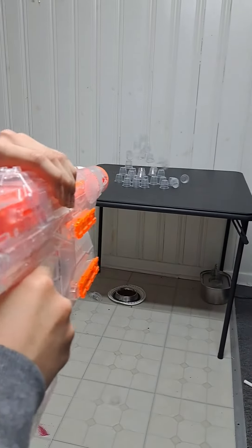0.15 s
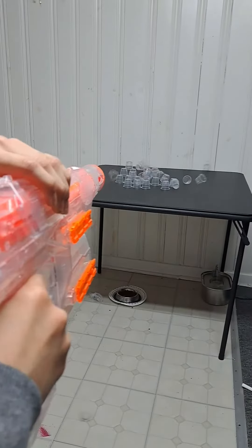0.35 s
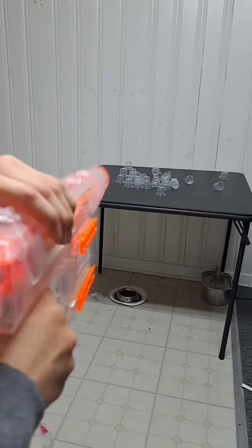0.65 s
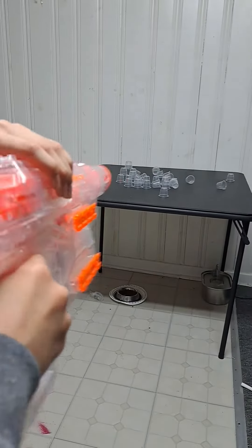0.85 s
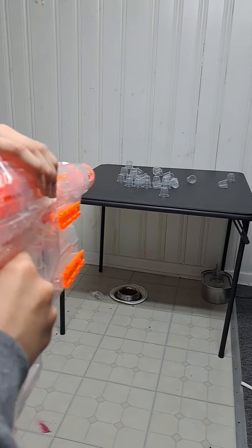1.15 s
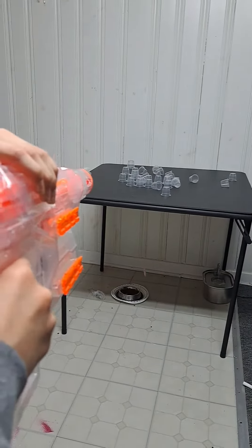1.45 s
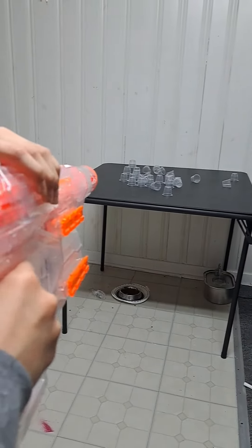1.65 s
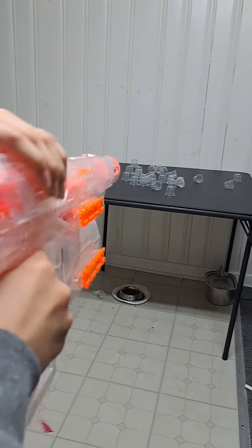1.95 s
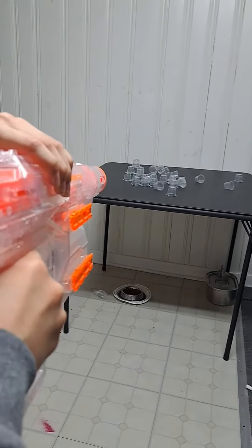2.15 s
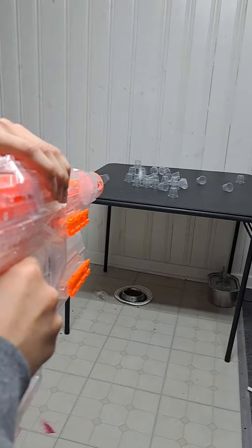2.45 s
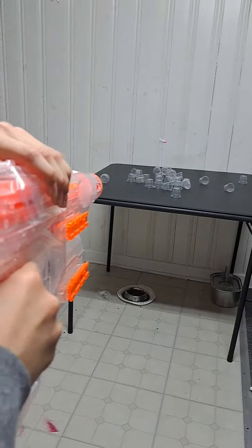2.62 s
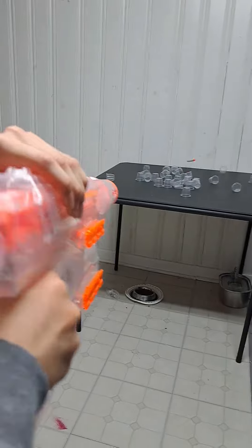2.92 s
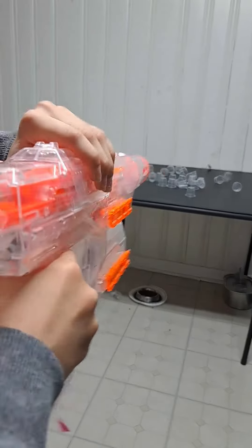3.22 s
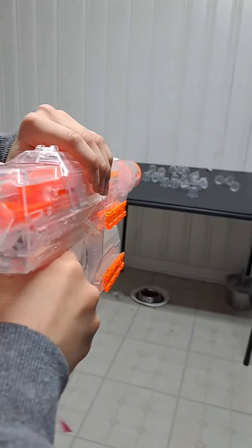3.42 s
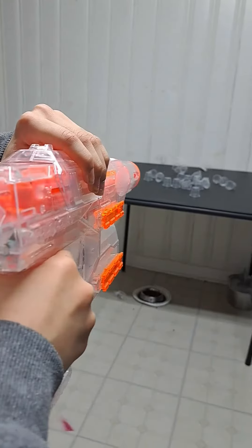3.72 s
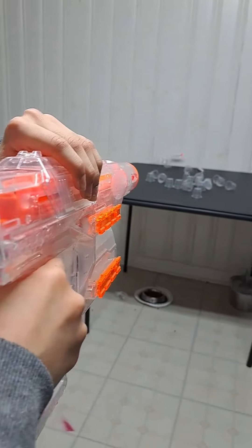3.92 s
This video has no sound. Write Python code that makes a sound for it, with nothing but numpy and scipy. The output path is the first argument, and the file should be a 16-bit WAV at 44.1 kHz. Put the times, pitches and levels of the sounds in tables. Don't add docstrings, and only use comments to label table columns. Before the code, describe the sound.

In a small hard-walled room with a faint hum, a toy dart blaster is handled close to the microphone. At 0.1 s, after a faint trigger tick, the plunger slams with a loud dry double crack, hollow boom and brief spring shake. At 0.2 s a dart slaps the far panel and plastic cups burst into bright hollow pops, clattering until about 0.5 s. The slide ratchets back at 0.6-0.7 s and snaps home at 0.9 s among bouncing cups. A second shot at 1.3 s brings a panel slap, table knocks and a short cup spin; racking follows at 1.8 s, snapping home at 2.1 s, then another soft spin. The third shot at 2.45 s brings a slap and cups clashing around 2.6 s; racking comes at 3.0 s, return at 3.25 s amid pops. The fourth shot at 3.6 s is followed by a slap and cups popping, rolling and ticking to the end.

```python
import sys
import numpy as np
from scipy import signal
from scipy.fft import rfft, irfft, next_fast_len
from scipy.io import wavfile
from scipy.ndimage import uniform_filter1d

SR = 44100
rng = np.random.default_rng(int(sys.argv[2]) if len(sys.argv) > 2 else 0)


def attenuation_scalar(level_db):
    decades = np.asarray(level_db, float) / 20
    return 10 ** decades


def to_wav(s):
    ch = np.atleast_2d(s).T
    pcm = np.round(np.clip(ch, -1, 1) * 32767)
    wavfile.write(sys.argv[1], SR, pcm.astype(np.int16))


N = 179751

# start in seconds, crack in dB.
TRIGGER = [
    (0.046, -32),
    (0.054, -36),
    (1.2354, -34.5),
    (1.2392, -30),
    (2.393, -33),
    (2.399, -34),
    (3.569, -34),
    (3.582, -33),
]
# slam in seconds, slam crack in dB, rebound lag in seconds, rebound crack in dB.
SHOTS = [
    (0.092, -2.5, 0.027, -4.5),
    (1.2896, -1, 0.025, -3.5),
    (2.451, 0, .0256, -4),
    (3.6346, 0, 0.024, -5.5),
]
# seconds after the slam, crack in dB re slam,
# shell boom in dB re crack, catch ring in dB re crack, blow length in ms.
SLAM = [
    (-.0085, -16, 5, -8, 10.3),
    (0, -0.5, -8.5, -10, 3.1),
    (.011, -16, 0, 3.5, 13),
]
# seconds after the rebound, then columns as in SLAM.
REBOUND = [
    (0, -1, -9.5, -5, 7),
    (.006, -3.5, -4.5, -9.5, 9),
    (.017, -11, -7, -3, 19),
]
# shell boom in dB re crack, catch ring in dB re crack, blow length in ms.
TEETH = [
    (0, -4.5, 12.4),
    (-1.5, -4, 6.3),
    (-4, -3.5, 8.5),
    (-13.5, -10, 9.7),
    (-5.5, -13, 1.2),
    (-18.5, -20, 0.77),
    (-12.5, -0.5, 4.9),
    (-13, -5.5, 5.25),
]
# start in seconds, crack in dB.
PULLS = [
    [(.6155, -32.5), (.6252, -10), (.6305, -20.5), (.65, -12), (.6662, -6), (.6758, 0), (.6912, -8.5),
     (.6985, -1.5)],
    [(1.78, -26.5), (1.797, -15.5), (1.8025, -18), (1.8215, -11.5), (1.8395, -15.5), (1.8495, -6),
     (1.8665, -16), (1.8765, -3)],
    [(2.9505, -23.5), (2.966, -14), (2.9712, -17), (2.9875, -13), (3.0038, -5.5), (3.0138, 0),
     (3.0315, -20), (3.0395, -3)],
]
# start in seconds, crack in dB,
# shell boom in dB re crack, catch ring in dB re crack, blow length in ms.
KNOCKS = [
    (1.9775, -22, 2, -10, 4.8),
    (3.132, -25.5, -1, 2, 5.2),
    (3.6918, -22, 14, 3, 3),
]
# frequency in Hz, level in dB per Hz.
CRACK = [(1470, -23.5), (2500, -5.5), (3400, -10), (5230, -7), (6860, -9), (8730, -15.5), (14500, -10.5),
         (16000, -24.5)]
# centre in Hz, width in Hz, level in dB.
SHELL = [(195, 75, -18.5), (357, 150, -4.5), (453.4, 69, 2), (503.5, 39, 3), (618, 277, -7.5),
         (1092, 17, -6)]
# centre in Hz, width in Hz, level in dB.
CATCH = [(1160, 70, -11.5), (1550, 164, -7.5), (1933, 77, -6), (2270, 450, -12.5)]
# seconds after it, rumble in dB, scrape in dB.
SHAKE = [
    (0, -38, -35.5),
    (0.021, -31, -24),
    (0.03, -23.5, -25),
    (.1, -31.5, -38),
    (.13, -66, -40),
]
# seconds after the stop, rumble in dB, scrape in dB.
STRAIN = [
    (-.2, -56, -58),
    (-.12, -54.5, -71),
    (-.085, -37, -46.5),
    (.009, -21.5, -32),
    (0.018, -28.5, -33),
]
# seconds after it snaps home, rumble in dB, scrape in dB.
GLIDE = [
    (-.12, -55, -57),
    (-.05, -53, -57),
    (-.009, -38, -39),
]

# seconds after the slam, grip thump in dB,
# shell ring in dB, catch clack in dB.
STROKES = [
    (-.007, -26.5, -19, -44),
    (0, -28, -18.5, -10),
]
# seconds after the rebound, then levels as in STROKES.
RECOIL = [
    (.0012, -50.5, -8.5, -18.5),
    (.0085, -64, -19.5, -19.5),
    (.021, -55, -23.5, -30),
]
# start in seconds, grip thump in dB, shell ring in dB, catch clack in dB.
LOOSE = [(.1405, -40, -38, -42), (2.496, -53, -20, -45), (3.6695, -49, -7, -37), (3.6922, -49, -11.5, -21),
         (3.7042, -52, -24, -16), (3.718, -53, -18, -36), (.6245, -40, -31, -42), (.634, -50, -38, -23),
         (.644, -48, -20.5, -44), (.6775, -43, -21, -40), (.6915, -30.5, -15, -40), (.699, -45, -15.5, -34),
         (.7085, -39, -28, -45), (1.3175, -45, -15.5, -31), (2.4775, -42.5, -15.5, -25),
         (.1195, -45, -9, -25), (.163, -50, -21, -47), (3.6615, -42, -12, -22), (3.665, -44, -15.5, -30),
         (2.548, -48, -25, -26), (3.606, -60, -54, -16), (3.614, -60, -60, -24), (3.5775, -60, -50, -39),
         (3.591, -65, -61, -29), (3.252, -46, -18, -38.5), (1.8535, -44, -19, -24), (1.866, -35, -19, -27),
         (1.878, -42, -33.5, -22.5), (2.9722, -45, -18, -43), (3.017, -50, -17.5, -36),
         (3.025, -49, -25, -22.5), (3.0405, -32.5, -22, -15.5)]
# start in seconds, level in dB.
STOPS = [
    (.8975, -14.5),
    (2.0792, -18.5),
    (3.2412, -11.5),
]
# start in seconds, level in dB.
TABLE_KNOCKS = [(0.29, -32), (0.423, -41), (0.457, -22.5), (0.51, -34.5), (.793, -30.5), (1.4276, -17),
                (1.4342, -10), (1.446, -20), (1.46, -25.5), (1.484, -24.5), (2.881, -44), (2.8979, -31),
                (2.92, -34), (3.1335, -35), (3.938, -31), (3.965, -36), (3.999, -30.5), (4.011, -30),
                (4.062, -29)]
# centre in Hz, width in Hz, level in dB.
GRIP = [(70, 130, 2), (184, 79, 7.5)]
# centre in Hz, width in Hz, level in dB.
CHAMBER = [(421, 81, -0.5), (521, 112, 2), (607, 106, 2.5)]
# centre in Hz, width in Hz, level in dB.
CLACK = [(1250, 72, -1.5), (1870, 320, 0), (2125, 57, 1.5), (2520, 220, -9)]
# centre in Hz, width in Hz, level in dB.
RAIL_PAIR = [(560.5, 72, 0), (727, 47, -3.5)]
# centre in Hz, width in Hz, level in dB.
TOP = [(196, 78, -9), (340, 130, 2)]

# start in seconds, slap peak in dB,
# panel thud in dB re slap, cup ring in dB re slap, blow length in ms.
DARTS = [(0.1925, -16.5, -13, 2.5, 14.3), (0.2011, -33, -9, 5, 26), (1.4263, -12, -2, -1, 6.7),
         (1.434, -25, 3.5, -14, 4.1), (1.5358, -28, -7.5, -34, 9.2), (1.6117, -28, -14, -12, 9.9),
         (2.536, -11.5, -11, 1.5, 13.2), (2.5442, -15, -20, -3, 13), (2.5534, -30, -15, 15, 17),
         (2.5649, -39, -16, 7, 9.4), (3.7388, -20, -8, 2, 32), (3.749, -24, 2, 5, 6.7),
         (3.7664, -36.5, -20, -2, 9.7), (4.0041, -19.5, -37, -0.5, 6.7)]
# frequency in Hz, level in dB per Hz.
SLAP = [(1500, -0.5), (2500, -31), (4000, 0.5), (7000, 1.5), (12000, 4), (16000, -0.5)]
# centre in Hz, width in Hz, level in dB.
PANEL = [(183.5, 9.1, -3), (310, 35, -8.5), (393, 100, -2.5), (460, 450, -2.5), (754, 120, -3)]
# centre in Hz, width in Hz, level in dB.
CUP_WALL = [(740, 1140, -12), (1400, 244, 0.5), (1580, 560, -5), (2295, 900, -8.5)]

# time in seconds, level in dB.
ROLLING = [(0.235, -55), (0.262, -20), (0.3, -42), (0.67, -35.5), (0.8, -55), (0.95, -42.5), (1.45, -37.5),
           (1.62, -44.5), (1.83, -45), (1.97, -37), (2.2, -52), (2.42, -53), (2.6, -71), (2.73, -63),
           (3.27, -86), (3.55, -44), (3.78, -27), (4.08, -44)]
# centre in Hz, width in Hz, level in dB.
RATTLE = [(1250, 65, 5), (1430, 69, 8.5), (1570, 290, 9), (1770, 960, -17.5)]
# start in seconds,
# peak in dB, cavity pitch in Hz, last pitch in Hz, turn in seconds.
SPINS = [
    (1.554, -36.5, 1157, 884, 0.05),
    (2.176, -33.5, 1418, 1133, 0.0686),
]

# start in seconds, peak in dB, cavity pitch in Hz.
CUPS = [(0.2454, 0.5, 1560), (0.245, -4, 1230), (0.2566, -20, 1220), (0.2537, -4.5, 1623),
        (0.264, -10, 1560), (0.273, -13, 1400), (0.7391, -9.5, 1475), (0.765, -16, 1570),
        (0.774, -16, 1580), (0.78, -34, 1570), (0.791, -23, 1490), (0.806, -36, 1550), (0.826, -20, 1455),
        (0.852, -12.5, 1400), (0.862, -20, 1340), (0.8717, -20, 1330), (0.9279, -19.5, 1350),
        (1.0047, -27.5, 1450), (1.0869, -26, 1550), (1.0922, -26, 1660), (1.114, -26.5, 1570),
        (0.964, -26, 1400), (1.2015, -29, 1430), (1.1955, -25.5, 1427), (1.2622, -27, 1430),
        (2.8873, -21.5, 1580), (3.149, -11.5, 1607), (3.1613, -15, 1470), (3.225, -32, 1600),
        (3.351, -20, 1530), (3.363, -21, 1480), (3.2669, -6, 1570), (3.272, -18, 1580), (3.289, -19, 1550),
        (3.3244, -7.5, 1560), (3.328, -7.5, 1453), (3.4861, -15, 1480), (3.508, -22, 1560),
        (3.525, -30, 1580), (3.538, -29, 1510), (3.552, -40, 1560), (3.587, -30, 1700),
        (3.6044, -12.5, 1650), (3.611, -36, 1506), (3.8023, -20.5, 1560), (3.8602, -29, 1580),
        (3.8805, -17, 1550), (3.898, -28, 1550), (3.911, -20, 1480), (3.918, -25, 1540),
        (4.0097, -20.5, 1530)]
# start in seconds, peak in dB, cavity pitch in Hz.
FLAT = [(0.2962, -15.5, 1570), (0.39, -22, 1600), (0.3974, -17.5, 1580), (0.404, -16, 1620),
        (0.4104, -16.5, 1570), (0.425, -32, 1490), (0.432, -27, 1460), (0.8776, -28, 1270),
        (1.491, -19, 1610), (1.494, -21.5, 1250), (1.515, -24.5, 1580), (2.6624, -17, 1550),
        (2.7575, -34, 1490), (4.0298, -19, 1680)]
# start in seconds, peak in dB, cavity pitch in Hz.
HEAP = [(2.5386, -23, 1380), (2.626, -0.5, 1517), (2.6284, -9, 1410), (2.6301, -6, 1610),
        (2.633, -5.5, 1493), (2.645, -21, 1550), (2.651, -15, 2100), (2.69, -17.5, 1580),
        (2.9108, -20.5, 1590), (3.8715, -10, 1550), (3.8758, -9, 1484)]
# rim tick in dB re pop, table thud in dB re pop.
CONTACT = [
    (-23.5, -28),
    (-14, 2),
    (-20, -8.5),
]
# start in seconds, tick peak in dB, thud in dB re tick,
# cup ring in dB re tick, blow length in ms.
LANDINGS = [(0.2811, -6, -47, -9, 5.8), (0.385, -12.5, -11, 2, 3.55), (0.4235, -42, 23, 6, 9.9),
            (0.455, -49, 23, -1.5, 2.5), (0.473, -20, -1.5, -31, 3.7), (.483, -25.5, -0.5, -20, 4.8),
            (0.5214, -18.5, -4, -24, 2.5), (.528, -25, -9, -25, 5.8), (.585, -32, 0, 0, 6.2),
            (0.7655, -17.5, -27, -16.5, 6), (0.7745, -17.5, -20, -10.5, 18), (1.0396, -24, 4, 5, 2.26),
            (1.0882, -26.5, -14, 1, 8.8), (2.8, -45.5, -4, 4, 17), (2.822, -53, -12.5, -5, 8),
            (2.8875, -33.5, -5, 9, 8), (3.1529, -19.5, -34, 9, 4.6), (3.6055, -24.5, -17, -6, 7.5),
            (3.8418, -13, -5, -8, 5.8), (3.8495, -28, -6.5, -19, 4.5), (3.934, -40, 14.5, -4, 12),
            (3.9985, -33, 9.5, -8, 9.5)]
# centre in Hz, width in Hz, level in dB.
TICK = [(3250, 600, 0), (3950, 600, 0), (5200, 1200, -6), (6600, 1600, -7), (10000, 3000, -13),
        (13200, 3000, -14)]
# centre in Hz, width in Hz, level in dB.
TABLE = [(181, 16, -8.5), (321, 162, -2.5), (361, 56, 3.5), (556, 300, -8)]

# start in seconds, touch in dB, first blow in dB, second blow in dB,
# catch ring in dB.
RETURNS = [
    (.899, -55, -9, -3.5, -1),
    (2.083, -36, -3.5, -7.5, -4),
    (3.246, -35, -5, -5.5, -5),
]
# seconds after the last, rail in dB re crack, catch ring in dB re crack, blow length in ms.
HOME = [
    (-.021, -3, 13, 15),
    (-.0045, -5.5, -2, 9.2),
    (0, -19, -2, 5.5),
]
# centre in Hz, width in Hz, level in dB.
RAIL = [(381, 108, -7.5), (612, 98, -6), (740, 27, -1.5), (1065, 100, -12)]

# frequency in Hz, decay by 60 dB in seconds.
ROOM = [(150, 0.16), (500, 0.24), (1500, 0.3), (4000, 0.26), (12000, 0.22)]
# frequency in Hz, level in dB per Hz.
HUM = [(15, -30), (55, 0), (161, -9), (427, 16), (863, -1), (2910, -13.5), (12500, -15.5), (16000, -56.5)]
# frequency in Hz, left over right in dB.
PORTS = [(60, -11), (110, 2.5), (380, -2), (700, -4.5), (2380, -2.5), (4400, -0.5), (8120, -2), (15000, 3)]
# frequency in Hz, left-right likeness from 0 to 1.
ALIKE = [(60, 0.98), (250, 1), (600, 0.98), (1500, 0.44), (15000, 0.022)]


def unit(x):
    return x / np.sqrt(np.mean(x ** 2) + 1e-20)


def along(points, hz):
    f, v = np.transpose(points)
    return np.interp(np.log(hz + 1), np.log(f + 1), v)


def curves(rows):
    s, *cols = np.transpose(rows)
    return [np.interp(np.arange(N) / SR, s, c, left=-120, right=-120) for c in cols]


def after(s, rows, db=0):
    return [(s + lag, db + level, *rest) for lag, level, *rest in rows]


def filtered(x, response):
    m = next_fast_len(N + SR // 4)
    return irfft(rfft(x, m) * response(np.fft.rfftfreq(m, 1 / SR)), m)[..., :N]


def colour(points):
    return lambda hz: unit(attenuation_scalar(along(points, hz)))


def resonances(modes):
    def response(f):
        h = 0
        for k, (centre, width, db) in enumerate(modes):
            damping = 1j * f * width
            h = h + (-1) ** k * attenuation_scalar(db) * damping / (centre * centre - f * f + damping)
        h = h * 1j * f / (1j * f + modes[0][0])
        return h / np.sqrt(np.mean(abs(h) ** 2))
    return response


def stereo(x, spread, lag_s):
    def blend(hz):
        turn = np.arccos(np.clip(along(ALIKE, hz), 0, 1) ** spread) / 2
        return np.array([np.cos(turn), np.sin(turn)])
    mid, side = filtered(x, blend)
    delay_s = lag_s / 2 * np.array([[1], [-1]])
    return filtered(np.array([mid + side, mid - side]), lambda hz: np.exp(-2j * np.pi * hz * delay_s))


def grit(size, rough_db):
    steps = rng.standard_normal(size[-1] // 16 + 1).repeat(16)[:size[-1]]
    return unit(rng.standard_normal(size) * attenuation_scalar(rough_db * steps))


def blows(rows, parts, rise):
    t = np.arange(SR // 16) / SR
    force = np.zeros((len(parts), 2, N + len(t)))
    for s, db, low_db, mid_db, ms in rows:
        u = t * 1000 / max(ms, 1)
        shape = (1 - np.exp(-u / rise)) * np.exp(-(1.5 * u) ** 1.5)
        noise = grit((len(parts), 2, len(t)), rough_db=2.5)
        pole = 0.8 * np.exp(2j * np.pi * rng.uniform(3500, 12000) / SR)
        noise[0] = unit(noise[0] + 0.5 * signal.lfilter([1], [1, -pole], noise[0]).real)
        gain = attenuation_scalar(db + np.array([0, low_db, mid_db]))[:, None, None]
        start = round(s * SR)
        force[..., start:start + len(t)] += gain * shape * noise
    return sum(attenuation_scalar(db) * filtered(f[:, :N], response) for f, (response, db) in zip(force, parts))


def blaster():
    boom_db, ring_db, blow_ms = -2.5, 1.5, 3.7
    contacts = KNOCKS + [(s, db, boom_db, ring_db, blow_ms) for s, db in TRIGGER]
    for pull in PULLS:
        contacts += [(*hit, *tooth) for hit, tooth in zip(pull, TEETH)]
    for s, db, lag, rebound_db in SHOTS:
        contacts += after(s, SLAM, db) + after(s + lag, REBOUND, rebound_db)
    parts = [(colour(CRACK), -6), (resonances(SHELL), -3), (resonances(CATCH), -4)]
    return stereo(blows(contacts, parts, rise=0.15), spread=1.0, lag_s=-0.000095)


def stroke_response(modes, push_ms):
    def response(hz):
        h = resonances(modes)(hz) / (1 + 2j * np.pi * hz * push_ms / 1000) ** 2
        return h / np.sqrt(np.mean(abs(h) ** 2))
    return response


def strokes():
    rows = list(LOOSE)
    for s, db, lag, rebound_db in SHOTS:
        rows += after(s, STROKES) + after(s + lag, RECOIL)
    s, grip, chamber, clack = np.transpose(rows)
    parts = [(s, grip, GRIP, 0.4), (s, chamber, CHAMBER, 0.2), (s, clack, CLACK, 0.04),
             (*np.transpose(STOPS), RAIL_PAIR, 0.1), (*np.transpose(TABLE_KNOCKS), TOP, 0.3)]
    sound = np.zeros(N)
    for s, db, modes, push_ms in parts:
        pushes = np.bincount(np.round(s * SR).astype(int), attenuation_scalar(db + 17.5), N)
        sound += filtered(pushes, stroke_response(modes, push_ms))
    return stereo(np.array([sound, 0.16 * np.roll(sound, 60)]), spread=0.72, lag_s=-0.00011)


def scraping():
    rub = grit((2, N), rough_db=3.5)
    rub = rub * attenuation_scalar(2.5 * rng.standard_normal(N // 128 + 1).repeat(128)[:N])
    moves = [after(s, SHAKE) for s, *_ in SHOTS]
    moves += [after(pull[-1][0], STRAIN) for pull in PULLS]
    moves += [after(s, GLIDE) for s, *_ in RETURNS]
    rumble_gain, scrape_gain = uniform_filter1d(sum(attenuation_scalar(curves(rows)) for rows in moves), size=400)
    rumble = attenuation_scalar(-5.0) * rumble_gain * unit(filtered(rub, resonances(SHELL)))
    scrape = attenuation_scalar(1.5) * scrape_gain * unit(filtered(rub, colour(CRACK)))
    return stereo(rumble + scrape, spread=1.0, lag_s=-0.000095)


def hands():
    t = np.arange(N) / SR
    jolts = [(s, -50) for s, *_ in SHOTS]
    jolts += [(pull[1][0], -60) for pull in PULLS]
    jolts += [(s, -64) for s, *_ in RETURNS]
    fade_db_s = 79.5
    gain = sum((t > s) * attenuation_scalar(db - fade_db_s * abs(t - s)) for s, db in jolts)
    arms = resonances([(70.5, 13, 0.0), (155.6, 114, -0.5)])
    return uniform_filter1d(gain, size=400) * unit(filtered(rng.standard_normal((2, N)), arms))


def darts():
    parts = [(colour(SLAP), -9), (resonances(PANEL), -1.5), (resonances(CUP_WALL), -6)]
    return stereo(blows(DARTS, parts, rise=0.016), spread=1.0, lag_s=0.00015)


def spin_swells():
    turn_loss_db, swell_share, sink = 1.65, 0.29, 0.4
    swells = []
    for (s, db, hz, last_hz, turn_s), life_s in zip(SPINS, (0.13, 0.22)):
        for k in range(int(life_s / turn_s) + 1):
            sunk_hz = last_hz + (hz - last_hz) * sink ** k
            for mode_db, pitch in ((0, sunk_hz), (-5, hz)):
                swells.append((s + k * turn_s, db - k * turn_loss_db + mode_db, pitch, swell_share * turn_s))
    return swells


def rolling():
    taps_per_s = 150
    taps = (rng.random(N) < taps_per_s / SR) * attenuation_scalar(2.5 * rng.exponential(1, N)) * rng.standard_normal((2, N))
    rattle = filtered(taps, lambda hz: resonances(RATTLE)(hz) / (1 + 1j * hz / 3000))
    power = abs(uniform_filter1d(np.mean(rattle ** 2, 0), SR // 8))
    rattle *= attenuation_scalar(curves(ROLLING)[0] - 13.5) / np.sqrt(power + 1e-9)
    t = np.arange(N) / SR
    rub = rng.standard_normal((2, N))
    for s, db, hz, width_s in spin_swells():
        at = slice(round((s - 0.1) * SR), round((s + 0.1) * SR))
        pole = np.exp((2j * np.pi * hz - np.pi * 110) / SR)
        breath = 0.4 * unit(signal.lfilter([1], [1, -pole], rub[:, at]).real)
        tone = np.sin(2 * np.pi * (hz * t[at] + rng.random((2, 1))))
        rattle[:, at] += attenuation_scalar(db - 7.5) * np.exp(-((t[at] - s) / width_s) ** 2) * (breath + tone)
    return stereo(rattle, spread=0.29, lag_s=0.00011)


def cup_pop(hz, t, detune):
    def tone(ratio):
        return np.sin(2 * np.pi * hz * ratio * t)
    pop = tone(1) + 0.026 * tone(1.334 + 0.026 * detune) * attenuation_scalar(-60 * t / 0.014)
    pop = pop + 0.031 * tone(1.1) + 0.033 * tone(1.63) * attenuation_scalar(-60 * t / 0.033)
    pop = pop * (1 - np.exp(-t / 0.0003)) * attenuation_scalar(-60 * t / 0.02)
    rocking = unit(signal.lfilter(np.hanning(120), 1, rng.standard_normal(len(t))))
    return pop * (1 + 0.35 * rocking * np.minimum(t / 0.004, 1))


def cups():
    t = np.arange(SR // 16) / SR
    pops, ticks, thuds, walls = np.zeros((4, 2, N + len(t)))
    bounces = [(*row, *way) for rows, way in zip((CUPS, FLAT, HEAP), CONTACT) for row in rows]
    for s, db, hz, tick_db, thud_db in bounces:
        detune, distance, side = rng.standard_normal(3)
        pop = cup_pop(hz, t, detune)
        echo_s = 0.003926 + 0.00176 * abs(distance)
        echo = np.pad(pop, (round(SR * echo_s), 0))[:len(t)]
        at = slice(round(s * SR), round(s * SR) + len(t))
        pops[:, at] += attenuation_scalar(db) * np.array([pop + 0.62 * echo, 0.97 * np.tanh(side) * echo])
        ticks[:, at] += attenuation_scalar(db + tick_db - 60 * t / 0.015) * rng.standard_normal((2, len(t)))
        thuds[:, at] += attenuation_scalar(db + thud_db - 13.0 - 60 * t / 0.038) * rng.standard_normal((2, len(t)))
        walls[:, at] += attenuation_scalar(db - 16 - 60 * t / 0.012) * grit((2, len(t)), rough_db=5)
    sound = filtered(pops[:, :N], lambda hz: (1j * hz / (1j * hz + 500)) ** 2)
    sound += filtered(ticks[:, :N], colour(SLAP))
    sound += filtered(thuds[:, :N], resonances(TABLE))
    sound += filtered(walls[:, :N], resonances(CUP_WALL))
    return stereo(sound, spread=3.5, lag_s=0.00009)


def landings():
    parts = [(resonances(TICK), -4), (resonances(TABLE), -4), (resonances(CUP_WALL), -5)]
    return stereo(blows(LANDINGS, parts, rise=0.28), spread=1.0, lag_s=0.00015)


def slide_return():
    contacts = []
    for s, *levels, ring_db in RETURNS:
        for db, (lag, rail_db, catch_db, ms) in zip(levels, HOME):
            contacts.append((s + lag, db, rail_db, catch_db + ring_db, ms))
    parts = [(colour(CRACK), -6), (resonances(RAIL), -3), (resonances(CATCH), -4)]
    return stereo(blows(contacts, parts, rise=0.09), spread=1.0, lag_s=-0.000063)


def room(x, gap_s):
    out, mono = np.zeros((2, N)), x.mean(0)
    low = filtered(mono, lambda hz: 1 / (1 + (hz / 2400) ** 8))
    hz, t, z = signal.stft(rng.standard_normal((5, 2, SR // 2)), SR, nperseg=256)
    decay = attenuation_scalar(-60 * t / along(ROOM, hz)[:, None])
    tails = signal.istft(z * decay, SR, nperseg=256)[1][..., :SR // 2]
    tails *= 1 - np.exp(-np.arange(SR // 2) / SR / gap_s)
    tails /= np.sqrt(np.sum(tails ** 2, -1, keepdims=True))

    def share(k, step):
        active = 1.0 * (np.arange(N) // step % len(tails) == k)
        return np.sqrt(abs(uniform_filter1d(active, size=step // 3)))

    for k, tail in enumerate(tails):
        sent = low * share(k, SR // 40) + (mono - low) * share(k, SR // 800)
        out += signal.fftconvolve(sent[None], tail, axes=1)[:, :N]
    return stereo(out, spread=32.0, lag_s=0)


def scene():
    near = blaster() + strokes() + scraping()
    far = darts() + landings()
    roll, pops, stop = rolling(), cups(), slide_return()
    wet = attenuation_scalar(-5) * near + attenuation_scalar(-7) * stop + attenuation_scalar(2.5) * far + attenuation_scalar(-2.0) * pops + attenuation_scalar(3.5) * roll
    hum = attenuation_scalar(-65.5) * filtered(rng.standard_normal((2, N)), colour(HUM))
    under = stereo(hum + hands(), spread=1.3, lag_s=0)
    return near + stop + far + pops + roll + room(wet, gap_s=0.0019) + under


def low_pass(x):
    return signal.sosfilt(signal.butter(12, 17000, fs=SR, output="sos"), x)


def record(dry):
    def shaping(hz):
        ports = attenuation_scalar(along(PORTS, hz) * np.array([[0.5], [-0.5]]))
        treble = attenuation_scalar(np.interp(hz, [15500, 15900, 16700, 17000], [0, -18, -20, -70]))
        bass = (1j * hz / (1j * hz + 25)) ** 2
        return ports * treble * bass
    x = filtered(dry, shaping)
    x = x / (1 + abs(x) ** 6) ** (1 / 6)
    return low_pass(x)


dry = scene()
out = record(dry)
to_wav(out)
```